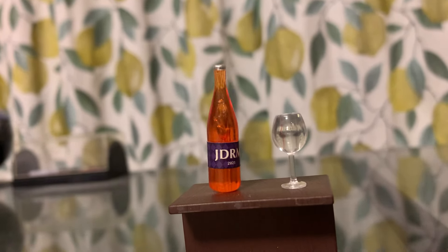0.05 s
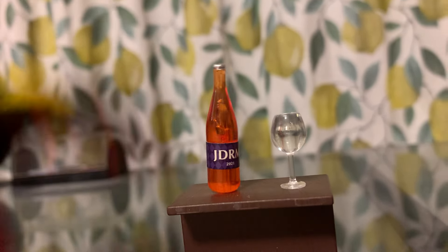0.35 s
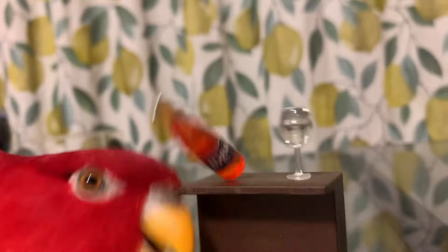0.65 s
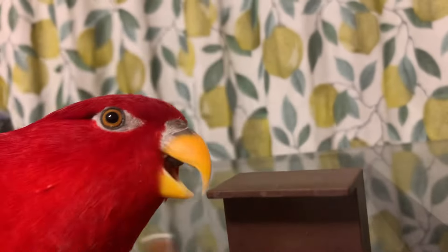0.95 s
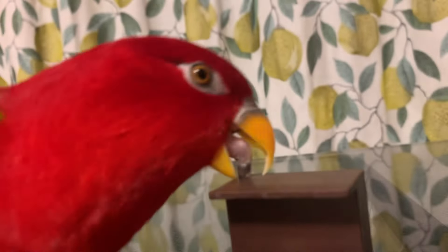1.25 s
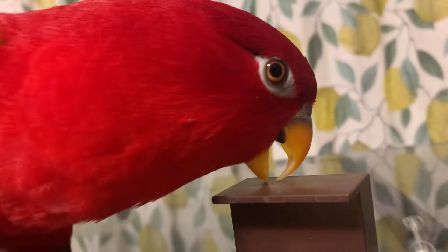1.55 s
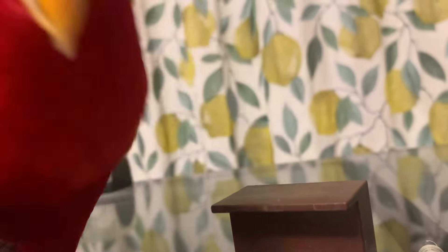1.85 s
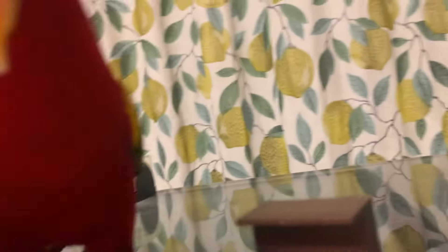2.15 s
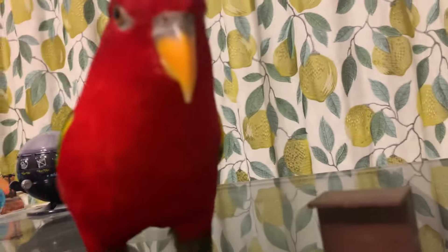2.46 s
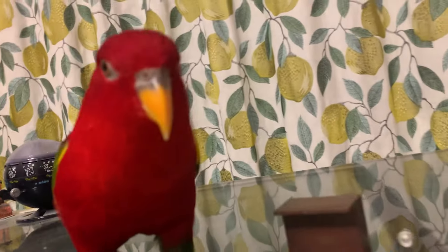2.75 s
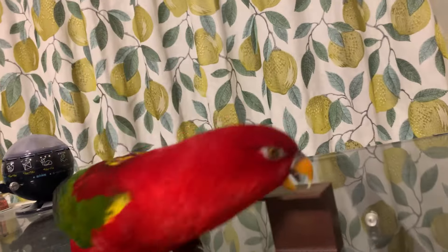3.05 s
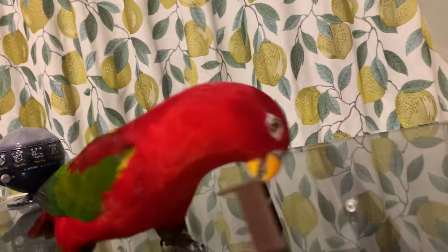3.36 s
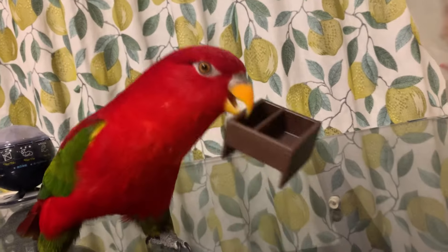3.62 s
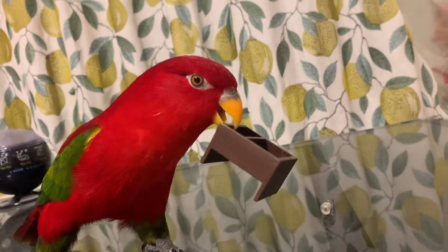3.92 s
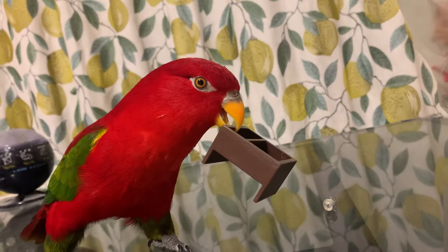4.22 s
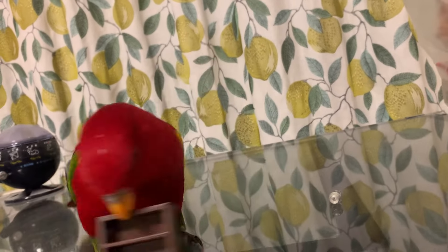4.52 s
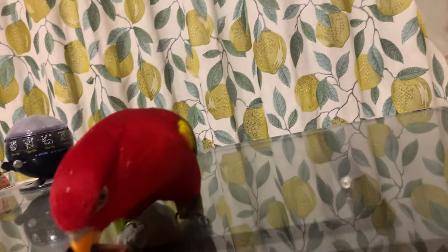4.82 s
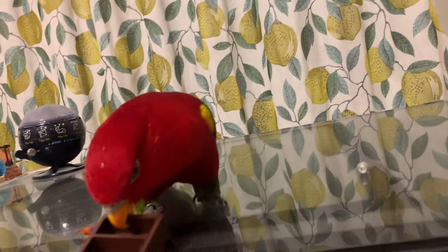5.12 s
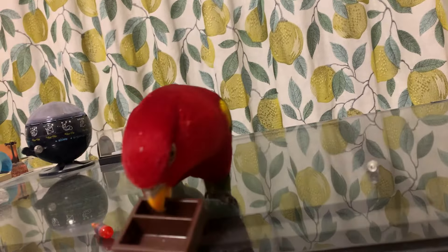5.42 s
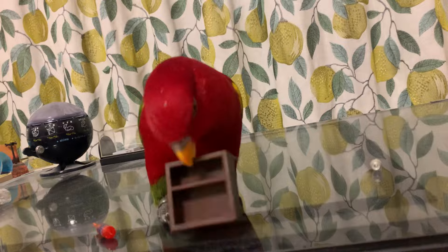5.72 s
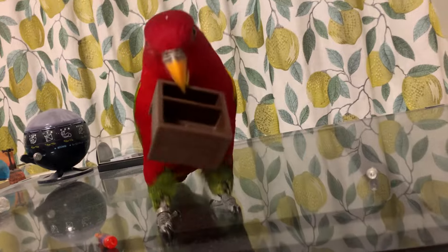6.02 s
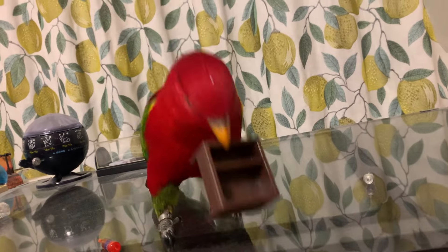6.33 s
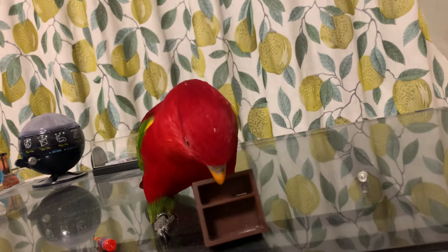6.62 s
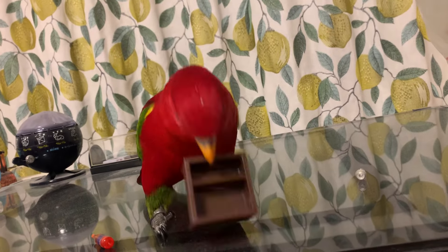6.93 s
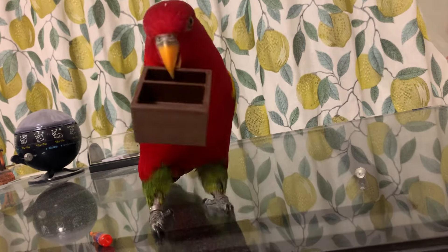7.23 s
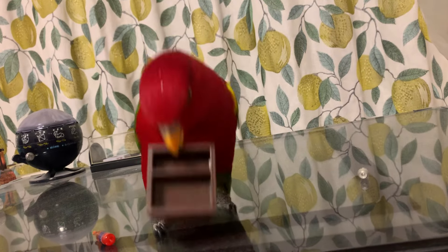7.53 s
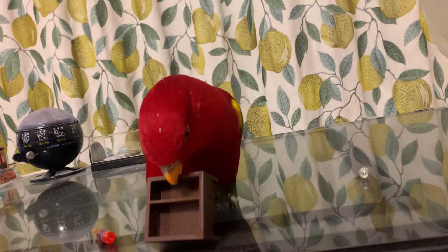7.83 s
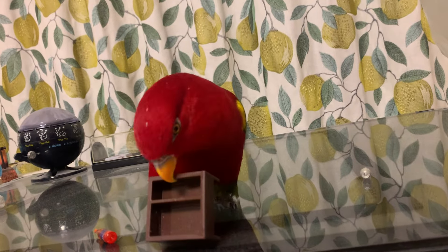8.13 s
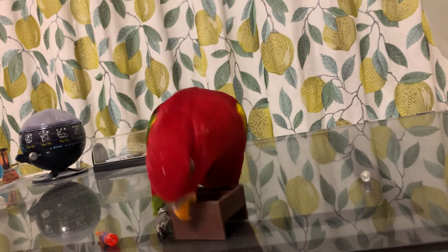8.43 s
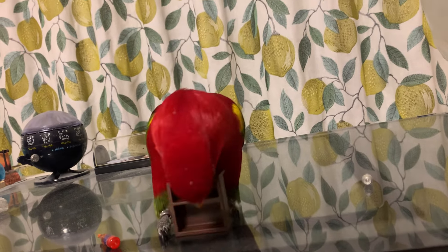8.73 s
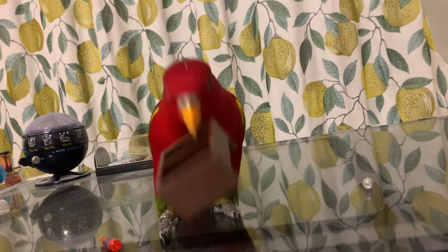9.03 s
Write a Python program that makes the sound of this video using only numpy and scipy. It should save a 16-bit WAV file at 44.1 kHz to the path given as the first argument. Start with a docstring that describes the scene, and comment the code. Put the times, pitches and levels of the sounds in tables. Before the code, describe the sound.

Fingers bump and rub the microphone for the first half second, over a soft hiss and low hum in a small, echoing room. At about 0.7 seconds a tiny bottle topples onto a glass table. A miniature wine glass bounces with rapid, bright clinks, mixed with a short roll, and rattles to rest by 1.7 seconds. A parrot's beak clicks lightly near 2 seconds, then pecks and scratches a toy cabinet from 3 to 4 seconds. The cabinet bangs down at 4.5 seconds and tumbles loudly with a brief scrape, making the table ring and boom. Faint dragging with small squeaks follows around 5.5 seconds. Single sharp knocks land at 6.4 and 7.6 seconds, with a few soft pecks afterwards. At 8.3 seconds the cabinet drops with a loud clack and a squealing skid, then clatters and rocks until about 8.8 seconds.

```python
"""First you hear fingers bump and rub a phone, over a soft mains hum in a small, echoing room.
A parrot on a glass table raids a doll's-house cabinet: a tiny bottle and wine glass fall, clink,
bounce and roll away. It pecks the cabinet, bangs it down, drags it and lets it tumble.
Each knock is a click and a burst of noise that makes the object ring and the table boom.
Each scrape is a stream of tiny catches as an edge sticks and slips."""
import sys
import numpy as np
from scipy import signal
from scipy.fft import rfft, irfft
from scipy.io import wavfile

SR = 44100
rng = np.random.default_rng(int(sys.argv[2]) if len(sys.argv) > 2 else 0)


def int16_out(signal):
    """Quantize to a 16-bit WAV file."""
    q = np.round(np.clip(np.atleast_2d(signal).T, -1, 1) * 32767)
    wavfile.write(sys.argv[1], SR, q.astype(np.int16))


N = 408807
T = np.arange(N) / SR

# The room's soft hiss. Each row: pitch in Hz, level in dB.
AIR_COLOUR = [(25, -34), (45, -9.5), (80, -5.5), (105, 1.5), (130, -13.5), (280, -11), (450, -22.5),
              (700, -26.5), (1300, -26), (2200, -34), (3500, -42), (7000, -46.5), (10000, -45),
              (16000, -51)]
# Bumps on the phone. Each row: time in seconds, pitch in Hz, level in dB, half length in seconds.
BUMPS = [(.01, 289, -28, 0.0086), (0.042, 293, -19, 0.0047), (0.054, 96, -15.5, 0.012),
         (0.08, 350, -31, 0.0026), (0.109, 90, -28, .008), (0.118, 327, -26, 0.0049),
         (0.15, 100, -31, 0.0047), (.154, 242, -32.5, 0.0045), (0.169, 78, -31.5, 0.016),
         (0.187, 325, -36.5, 0.0052), (0.281, 65, -35, 0.024), (0.288, 318, -34.5, 0.01),
         (0.296, 310, -34.5, 0.0086), (0.3577, 810, -27.5, 0.0013), (0.3583, 394, -25, 0.0013),
         (0.363, 170, -35, 0.0044), (0.416, 98, -23.5, 0.0045), (0.463, 159, -29.5, 0.012),
         (0.495, 126, -38, 0.0083)]
# Fingers rub the phone. Each row: start and length in seconds, level in dB.
RUB = [(0.0059, 0.51, -31)]
# The rub's tone. Each row: pitch in Hz, level in dB.
RUB_COLOUR = [(35, 16.5), (130, 7.5), (450, 0), (700, -2), (1200, -7), (1800, -13.5), (3500, -12.5),
              (7000, -20), (10000, -21), (16000, -28)]

# The borders in Hz of a knock's four ranges: thud, clack, snap and tick.
RANGE_EDGES_HZ = [150, 1400, 4000, 7500, 16000]
# Dull taps: fingers knocking the phone at first, then light taps on the table.
# Each row: start in seconds, level in dB, sharpness from 0 (flat) to 1 (sharp).
TAPS = [(.2803, -40.5, 1), (.3547, -38.5, 0.8), (.3859, -44.5, 0.16), (3.1303, -48, 0.37),
        (4.003, -69.5, 0.07), (4.06, -66.5, 0.6), (4.074, -66, 0.4), (5.286, -55, 0.27), (8.8, -45.5, 0.5)]
# How a tap lands. All TOUCH tables have a flat row, then a sharp row. Each row: fade time in seconds,
# then thud, clack, snap, tick and ring in dB added to the knock's level, then left minus right in dB.
TAP_TOUCH = [(0.0056, 0.021, 3.5, -20.5, -19.5, -29, 0), (0.0067, 0.0015, -16, -18, -12.5, -45.5, -1.2)]
# The beak pecks and nibbles. Each row: start in seconds, level in dB, sharpness.
PECKS = [(1.9392, -47.5, 0.78), (1.951, -45.5, 0.85), (2.9334, -57.5, 0.78), (3.015, -43.5, 0.48),
         (3.198, -49, 0.6), (3.206, -61, 0.76), (3.3288, -34.5, 0.75), (3.4066, -42, 0.3),
         (3.7099, -58.5, 0), (4.026, -60.5, 0.3), (4.073, -67, .35), (5.658, -66, 0.7), (7.7974, -56, 0),
         (7.8298, -45, 0), (8.089, -64.5, 0.58), (8.184, -80, 0.91)]
# How the beak lands, laid out like TAP_TOUCH.
BEAK_TOUCH = [(0.019, -17.5, -0.54, -17.5, -68.5, -21.5, -1.5), (0.0029, -16.5, -0.26, 5.5, 17, -7, -3.5)]
# Tones of the beak on the cabinet's edge. Each row: pitch and width in Hz, level in dB.
BEAK_BODY = [(466, 80, 2.5), (2640, 470, 17), (3387, 250, 10), (4326, 470, 8), (5640, 1000, 4.5),
             (10470, 120, 9.5)]
# The hollow ring of taps and pecks. Each row: pitch in Hz, level in dB, seconds to fade by 60 dB.
HOLLOW_MODES = [(487, -4.5, .16), (576, -6.5, 0.11), (1212, -3, 0.035), (3420, 3, 0.038), (4270, -10, 0.15)]
# The table top bends and booms. Each row: pitch in Hz, level in dB, seconds to fade by 60 dB.
BOOM_MODES = [(64, -16, 0.54), (98.5, -7, 0.34), (133, -10, 0.33), (170, -6.5, 0.31), (223.9, -5, 0.27),
              (284, -0.5, 0.074), (373, -5, 0.079), (434, 0, 0.24), (495, -5, 0.1), (564, -5, 0.11),
              (681, 1.5, 0.11), (783, -0.5, 0.12), (900, -3.5, 0.15)]

# The bottle slides off, then rolls. Each row: start and length in seconds, level in dB.
ROLL = [(.62, 0.053, -62.5), (.712, 0.027, -32.5), (1.115, 0.13, -27)]
# The roll's tone. Each row: pitch in Hz, level in dB.
ROLL_COLOUR = [(120, -14), (450, -14), (950, 4), (1400, 1), (2500, 2), (3500, -2.5), (4500, -18),
               (7000, -21.5), (10400, -19), (12000, -36), (16000, -43)]
# The bottle topples. Each row: start in seconds, level in dB, sharpness.
TOPPLE = [(.673, -45, 0.14), (.6915, -37, 0.76), (.709, -38.5, 0.093), (.7165, -37.5, 0.22),
          (.7375, -44.5, 0.45), (.8015, -37, 0.73), (.8065, -31, 0.68)]
# How the bottle lands, laid out like TAP_TOUCH.
BOTTLE_TOUCH = [(.0035, 4, -6.5, -7, -10, 1, -1.5), (.0035, -12.5, 6, -8, 4, 10, 0)]
# Tones of the bottle on the table. Each row: pitch and width in Hz, level in dB.
BOTTLE_BODY = [(530, 200, 3.5), (1000, 620, 0.5), (2292, 460, 11), (3492, 110, 22.5), (4200, 330, 11.5),
               (8850, 690, 14), (11200, 390, 7)]
# The bottle rings. Each row: pitch in Hz, level in dB, seconds to fade by 60 dB.
BOTTLE_MODES = [(3450, -8, .022), (3960, -8.5, .02), (5020, -3, 0.02), (5740, -4, 0.018),
                (6150, -11, 0.013), (8600, -2.5, .016), (9400, -8, 0.016)]
# Pings from stiff spots. Each row: start in seconds, pitch in Hz, level in dB,
# seconds to fade by 60 dB, left minus right in dB.
PINGS = [(.8095, 3340, -18, 0.021, -2), (3.016, 4240, -58, 0.28, -2), (3.198, 3470, -30, 0.031, -6),
         (3.205, 5820, -43, .035, -7), (3.3285, 4100, -24, 0.013, -9), (3.3285, 4340, -43, .3, -2),
         (3.329, 10600, -25, 0.021, -2), (3.33, 517, -45.5, 0.15, 0), (4.7795, 5830, -25, 0.023, 0.5),
         (5.6575, 5337, -49.5, .035, -4), (8.2878, 5050, -3.5, 0.031, -7.5),
         (8.3324, 4760, -15.5, 0.023, -5.5), (8.359, 2270, -17, 0.017, -7.5), (8.5462, 4310, -30, .24, 2),
         (8.548, 8540, -20, .02, 2)]
# Bottle and wine glass bounce. Each row: start in seconds, level in dB, sharpness.
BOUNCES = [(0.8101, -28.5, 1), (.812, -30.5, 0.7), (.88, -49, 0.8), (0.8935, -32, 0.87),
           (0.9349, -26.5, 0.53), (.942, -30, 0.68), (1.0131, -30.5, 0.6), (1.0306, -34, .7),
           (1.0387, -28, 0.92), (1.0896, -25, 0.63), (1.1185, -27.5, 0.84), (1.149, -31.5, 0.67),
           (1.199, -29, 0.56), (1.228, -26.5, 0.6), (1.2434, -29.5, 0.63), (1.255, -30, 0.45),
           (1.289, -30, 0.53), (1.325, -31, 0.5), (1.3548, -32.5, 0.5), (1.358, -28, 0.4),
           (1.3818, -38, 0.65), (1.44, -35.5, 0.56), (1.4652, -43, 0.73), (1.503, -39, 0.1),
           (1.6028, -44, 0.15), (1.6753, -56, 0.06)]
# How the wine glass lands, laid out like TAP_TOUCH.
GLASS_TOUCH = [(0.0039, -13.5, 0, -0.86, -16.5, -24, -1.8), (0.0071, -12.5, -5, 0.15, 3.5, 11, -1.8)]
# Tones of its bowl and foot. Each row: pitch and width in Hz, level in dB.
GLASS_BODY = [(543, 180, 1), (984, 330, 1.5), (2330, 480, 10), (3297, 500, 11.5), (4980, 499, 3.5),
              (8870, 1200, 7.5), (10340, 400, 3.5)]
# The wine glass rings. Each row: pitch in Hz, level in dB, seconds to fade by 60 dB.
GLASS_MODES = [(10430, 0.5, 0.033), (10340, -8, 0.0095)]
# The rolling glass rattles. Each row: start and length in seconds, level in dB.
RATTLE = [(1.525, 0.038, -50.5), (1.635, 0.066, -53.5)]
# The rattle's tone. Each row: pitch in Hz, level in dB.
RATTLE_COLOUR = [(300, -6), (1200, -9), (2500, -1), (3500, 0.5), (5000, -1), (7000, -6), (10500, -24),
                 (12000, -22), (16000, -35)]

# The beak or a cabinet corner scratches. Each row: start and length in seconds, level in dB.
SCRATCHES = [(3.23, 0.029, -62.5), (3.308, 0.055, -54), (3.41, 0.069, -50.5), (4.8, .095, -42),
             (8.55, 0.06, -39.5)]
# A scratch's tone. Each row: pitch in Hz, level in dB.
SCRATCH_COLOUR = [(400, -2), (1500, -3), (2600, 0.5), (3500, 5.5), (4400, 4), (5500, -2.5), (7500, -3),
                  (9600, -10.5), (10500, -1.5), (11300, -21.5), (16000, -30.5)]
# A skidding edge squeals. Each row: start and length in seconds, pitch in Hz, level in dB.
SQUEALS = [(3.399, 0.022, 10460, -52), (4.837, 0.0099, 10450, -35), (4.866, .02, 10620, -46),
           (8.303, 0.093, 3188, -34), (8.335, 0.052, 7680, -39.5)]
# The cabinet is banged down. Each row: start in seconds, corner level in dB,
# seconds until the base lands, base level in dB, extra snap in dB.
BANGS = [(4.477, -30, .004, -32, 3.5), (6.397, -35, .0106, -28, -3.5), (7.5513, -35.5, 0.0095, -25.5, 1.5)]
# How a bang lands, laid out like TAP_TOUCH.
BANG_TOUCH = [(.004, -2.5, -12, 0.015, 0.81, -4.5, -2.5), (0.0065, -3, -15, 0.94, 1.4, -6, -1.5)]
# The cabinet's hollow tones. Each row: pitch and width in Hz, level in dB.
CABINET_BODY = [(243, 36, -1.5), (440, 24, 11.5), (490, 39, 13.5), (564, 24, 11.5), (680, 40, 6.5),
                (794, 29, 6), (870, 35, 4.5), (985, 45, 8), (1136, 64, 13.5), (1290, 97, 1), (1550, 23, -4),
                (1870, 8.3, 5.5), (2220, 370, 8.5), (2590, 430, 2), (3120, 170, 1), (5235, 140, 5.5),
                (5800, 430, 12), (6930, 250, 3.5), (7460, 96, 5.5), (8543, 380, 11.5), (9550, 730, 10)]
# The glass table rings. Each row: pitch in Hz, level in dB, seconds to fade by 60 dB.
TABLE_MODES = [(4285, 7, 0.06), (4370, -14, .2), (4130, -3, .05), (4200, -14, 0.18), (4440, -24, .25),
               (5200, 0, 0.026), (5340, -12, .025), (8100, -14, 0.015)]
# The loose cabinet drops, tips and rocks. Each row: start in seconds, level in dB, sharpness.
TUMBLES = [(4.5428, -48, .95), (4.7177, -36, .7), (4.734, -32, 0.7), (4.7378, -18.5, 0.03),
           (4.7475, -16.5, .24), (4.7795, -26, 0.3), (4.8426, -43, .4), (8.288, -17, 0.05),
           (8.2902, -27, 0.2), (8.3324, -22.5, 0.29), (8.359, -28.5, 0.3), (8.3772, -40.5, .55),
           (8.417, -37.5, 0.6), (8.4955, -38, 0.7), (8.502, -38.5, .94), (8.523, -46, 0.9),
           (8.5336, -38.5, 1), (8.5462, -24, 0.04), (8.5495, -22, 0.2), (8.569, -40.5, .93),
           (8.589, -43, 0.93), (8.5986, -42, 0.8), (8.6076, -29, 0), (8.618, -32.5, 0.26),
           (8.6479, -36.5, 0), (8.724, -45.5, 0.16), (8.7849, -40.5, 0), (8.8, -53.5, 0.83),
           (8.811, -47.5, 0)]
# How the loose cabinet lands, laid out like TAP_TOUCH.
TUMBLE_TOUCH = [(0.0071, -16.5, 0, -8, -21.5, -5, -1.5), (0.0018, -8.5, -11, -1, 3, -11, -3)]
# Its panels and the table ring. Each row: pitch in Hz, level in dB, seconds to fade by 60 dB.
PANEL_MODES = [(1150, -6.5, .08), (1557, -0.5, .08), (1730, -7, 0.081), (2210, -8.5, .04), (2723, 0.5, .05),
               (3326, -3, .06), (4190, -7, 0.11), (4280, -5, .08), (4930, -6, .05), (5680, -7.5, .06)]

# The cabinet is dragged. Each row: start and length in seconds, level in dB.
DRAGS = [(5.35, 0.075, -57.5), (5.53, 0.075, -57)]
# The drag's tone. Each row: pitch in Hz, level in dB.
DRAG_COLOUR = [(150, -4), (500, 13), (1200, 1.5), (2200, 4), (3300, -1), (4050, 0), (4300, 6), (4600, 1),
               (5500, -8), (6300, -7), (7800, 1), (8500, 0.5), (9200, -14), (10300, -14), (11500, -22),
               (16000, -41)]
# The dragged edge jolts. Each row: start in seconds, level in dB, sharpness.
JOLTS = [(5.3112, -66, 0.15), (5.3626, -55.5, 1), (5.3905, -61, .5), (5.4943, -58.5, 0.7),
         (5.5287, -53, 0.3), (5.5422, -57, 0.3), (5.5591, -51, 0.6), (5.589, -53.5, .7),
         (5.602, -52.5, 0.9)]
# How a jolt lands, laid out like TAP_TOUCH.
JOLT_TOUCH = [(0.0076, -1, -16, -7, -18, -5, -1), (0.0035, -6, -15, -4.5, -13, -3.5, -1)]
# The table squeaks. Each row: start and length in seconds, level in dB.
SQUEAK = [(5.4, 0.035, -57), (5.535, 0.02, -46), (5.56, 0.015, -46.5), (5.582, 0.013, -54)]
# The squeak's tone. Each row: pitch in Hz, level in dB.
SQUEAK_COLOUR = [(2000, -54), (3900, -17), (4200, 0), (4330, 4), (4480, -16), (4800, -28), (9000, -55)]
# The cabinet shifts in the beak. Each row: start and length in seconds, level in dB.
SHIFT = [(7.1, 0.043, -62), (7.44, 0.029, -63.5)]
# The shift's tone. Each row: pitch in Hz, level in dB.
SHIFT_COLOUR = [(400, -17.5), (900, 2), (1150, 5.5), (1600, -10.5), (3000, -14), (5500, -24), (8000, -41),
                (16000, -45)]
# The tipped cabinet skids on one edge. Each row: start and length in seconds, level in dB.
SKID = [(7.832, 0.07, -58), (8.283, 0.06, -30)]
# The skid's tone. Each row: pitch in Hz, level in dB.
SKID_COLOUR = [(300, -11.5), (1200, -14.5), (2200, 1.5), (2650, 4), (3300, 5.5), (3700, -4), (4800, 5.5),
               (5100, 3), (5500, -2.5), (6300, -1.5), (7300, -10), (9300, -22.5), (11000, -38.5),
               (16000, -43)]

# The room's echo. Each row: pitch in Hz, level in dB, seconds to fade by 60 dB.
ROOM = [(150, 4, 1), (407, -2.5, 0.29), (900, -6.5, 0.53), (1850, -10, 0.57), (4130, -6.5, 0.54),
        (6500, -12.5, 0.45), (9600, -16, 0.26), (14000, -17.5, 0.38)]
# The microphone's tone. Each row: pitch in Hz, boost in dB.
MICROPHONE = [(20, 3.5), (10800, -0.5), (11800, 2.5), (14000, -2), (16000, -8)]


def undb(db):
    """Turn decibels into a multiplier."""
    return 10 ** (np.asarray(db) / 20)


def unit(x):
    """Scale a sound to an average power of 1."""
    return x / np.sqrt(np.mean(x ** 2))


def blow_level(x, db):
    """Set a knock's level by its first moments."""
    power = np.sum(x[..., :int(.012 * SR)] ** 2, axis=-1).mean() / (.01 * SR)
    return x * undb(db) / np.sqrt(power)


def add(out, s, x):
    """Mix x into out from s seconds on."""
    i = max(int(s * SR), 0)
    out[:, i:i + x.shape[-1]] += x[..., :N - i]


def sides(pan_db):
    """Left and right multipliers, pan_db apart."""
    return unit(undb(np.array([[pan_db], [-pan_db]]) / 2))


def band(x, lo_hz, hi_hz, order=3):
    """Keep the sound between two pitches."""
    sos = signal.butter(order, [lo_hz, min(hi_hz, SR / 2 - 1)], "band", fs=SR, output="sos")
    return signal.sosfilt(sos, x)


def colour(x, points):
    """Shape a sound's tone along (Hz, dB) points."""
    hz, db = np.transpose(points)
    f = np.fft.rfftfreq(x.shape[-1], 1 / SR) + 1
    gain = undb(np.interp(np.log(f), np.log(hz), db)) * np.minimum(f / hz[0], 1)
    return irfft(rfft(x) * gain, x.shape[-1])


def stereo(pair, alike_hz):
    """Turn two unrelated noises into a left and right that agree in the bass."""
    f = np.fft.rfftfreq(pair.shape[-1], 1 / SR)
    alike = .95 / (1 + (f / alike_hz) ** 2)
    mid, side = rfft(pair) * np.sqrt([1 + alike, 1 - alike])
    return irfft(np.array([mid + side, mid - side]), pair.shape[-1]) / np.sqrt(2)


def ringing(modes, t, detune, spread_db):
    """A struck thing rings with fading tones (modes); each spot gives another mix."""
    tone = 0
    for hz, db, fade_s in modes:
        shift, size, start, offset = rng.standard_normal(4)
        apart = offset * min(hz / 1500, 1)
        phase = 2 * np.pi * hz * (1 + detune * shift) * t + np.pi * start + np.array([[apart], [-apart]])
        tone = tone + undb(db + spread_db * size - 60 * t / fade_s) * np.sin(phase)
    return tone


def contacts(rows, touch):
    """How sharply a knock lands sets its length, tone, ring and side."""
    flat, sharp = np.array(touch)
    hits = []
    for s, db, sharpness in rows:
        decay, *levels, pan_db = flat + np.clip(sharpness, 0, 1) * (sharp - flat)
        hits.append((s, decay, *(db + np.array(levels)), pan_db))
    return hits


def strikes(hits, body, modes, spot_db, body_db, ring_db, detune, rise_s, first_db, grain,
            linger_db, linger_s, click_db):
    """Hard edges click and chatter; this sounds through the object's body and sets it ringing."""
    out, t = np.zeros((2, N)), T[:SR // 3]
    attack = 1 - np.exp(-t / rise_s)
    for s, decay, *levels, ring, pan_db in hits:
        first_touch = undb(first_db) * np.exp(-t / .00067)
        linger = undb(linger_db) * np.exp(-t / linger_s)
        envelope = attack * (first_touch + np.exp(-t / max(decay, 1e-4)) + linger)
        noise = stereo(rng.standard_normal((2, len(t))), 2000)
        chatter = noise * np.exp(grain * rng.standard_normal(len(t))) * envelope
        chatter[:, int(rise_s * SR)] += undb(click_db)
        hollow = chatter
        for hz, width, db in body:
            gain = undb(db + body_db + spot_db * rng.standard_normal())  # varies with the spot struck
            hollow = hollow + gain * signal.lfilter(*signal.iirpeak(hz, hz / width, SR), chatter)
        ranges = zip(RANGE_EDGES_HZ, RANGE_EDGES_HZ[1:], levels)
        knock = sum(blow_level(band(hollow, lo, hi, order=4), db) for lo, hi, db in ranges)
        tone = blow_level(attack * ringing(modes, t, detune, spread_db=1.5), ring + ring_db)
        add(out, s - rise_s, (knock + tone) * sides(pan_db))
    return out


def strokes(rows, rise, fall, sag_db, depth_db=22):
    """Each stroke swells, sags and dies away; rise and fall are multiples of its length."""
    return [[(s - rise * length, db - depth_db), (s, db), (s + length, db - sag_db),
             (s + (1 + fall) * length, db - sag_db - depth_db)] for s, length, db in rows]


def friction(curves, points, per_second, spread_db, slip_db, slip_hz):
    """A sliding edge makes many tiny catches, which swell and stall as it sticks and slips."""
    catches = (rng.random(N) < per_second / SR) * undb(spread_db * rng.standard_normal(N))
    grains = stereo(catches * rng.standard_normal((2, N)), 1100)
    grip = rng.uniform(-1, 1, 4096)
    slip = undb(slip_db * np.interp(T * slip_hz, np.arange(len(grip)), grip))
    force = sum(undb(np.interp(T, *np.transpose(curve), left=-np.inf, right=-np.inf)) for curve in curves)
    return unit(colour(grains * slip, points)) * force


def background(air_db=-59, hum_hz=103.2, hum_db=-63.5):
    """The room's air hisses softly and an appliance gives a wavering hum."""
    air = unit(colour(stereo(rng.standard_normal((2, N)), 740), AIR_COLOUR))
    waver = unit(band(rng.standard_normal(N), .5, 6, order=1))
    hum = np.sqrt(2) * np.sin(2 * np.pi * hum_hz * T + .14 * waver)
    return undb(air_db) * air + undb(hum_db) * hum


def handling():
    """Fingers bump the phone's case, giving it a few dull swings, and rub over it."""
    bumps = np.zeros((2, N))
    for s, hz, db, width in BUMPS:
        t = T[:SR] - s
        phase = 2 * np.pi * hz * t + np.pi * rng.standard_normal() + .5 * rng.standard_normal((2, 1))
        add(bumps, 0, undb(db) * np.exp(-(t / width) ** 2) * np.sin(phase))
    return bumps + friction(strokes(RUB, rise=.11, fall=1, sag_db=26), RUB_COLOUR,
                            per_second=14000, spread_db=2, slip_db=3.5, slip_hz=54.86)


def taps_and_pecks(hits):
    """Taps and pecks ring briefly and hollowly."""
    return strikes(hits, BEAK_BODY, HOLLOW_MODES, spot_db=6, body_db=-6.5, ring_db=-1, detune=.0036,
                   rise_s=.00067, first_db=11.5, grain=.066, linger_db=-33, linger_s=.021, click_db=15.5)


def table_boom(hits, boom_db):
    """Each thud bends the glass top, which booms; a light, clacking bounce bends it less."""
    out, t = np.zeros((2, N)), T[:SR // 2]
    attack = 1 - np.exp(-t / .00043)
    for s, _, thud_db, clack_db, *_ in hits:
        push_db = thud_db - .41 * max(clack_db - thud_db, 0)
        add(out, s, undb(push_db + boom_db) * attack * ringing(BOOM_MODES, t, detune=.039, spread_db=1.5))
    return out


def rolling():
    """The bottle slides and rolls; the rolling wine glass rattles to rest."""
    roll = friction(strokes(ROLL, rise=.82, fall=.69, sag_db=6), ROLL_COLOUR,
                    per_second=7600, spread_db=0, slip_db=2.5, slip_hz=61.7)
    rattle = friction(strokes(RATTLE, rise=.3, fall=1.2, sag_db=3), RATTLE_COLOUR,
                      per_second=650, spread_db=1, slip_db=1, slip_hz=50)
    return roll + rattle


def bottle_clinks(hits):
    """The toppling bottle strikes the table and rings briefly."""
    return strikes(hits, BOTTLE_BODY, BOTTLE_MODES, spot_db=1.5, body_db=0, ring_db=2.5, detune=.025,
                   rise_s=.0008, first_db=-9, grain=.3, linger_db=-27, linger_s=.01, click_db=10)


def pings():
    """A knock on a stiff spot picks out one fading tone."""
    out, t = np.zeros((2, N)), T[:SR // 3]
    for s, hz, db, fade_s, pan_db in PINGS:
        tone = (1 - np.exp(-t / .0003)) * ringing([(hz, db, fade_s)], t, detune=.003, spread_db=-2)
        add(out, s, tone * sides(pan_db))
    return out


def glass_contacts(on_side_s=1.28, foot_lag_s=.0142, foot_db=-3, foot_sharpness=.33):
    """Once the bouncing wine glass lies on its side, its foot lands just after its bowl."""
    feet = [(s + foot_lag_s, db + foot_db, foot_sharpness) for s, db, _ in BOUNCES if s > on_side_s]
    return contacts(BOUNCES + feet, GLASS_TOUCH)


def glass_clinks(hits):
    """The tiny wine glass lands with a hard click and a very high ring."""
    return strikes(hits, GLASS_BODY, GLASS_MODES, spot_db=5.5, body_db=.5, ring_db=-.5, detune=.02,
                   rise_s=.0002, first_db=6, grain=.41, linger_db=-29, linger_s=.017, click_db=23)


def cabinet_scrapes():
    """The cabinet rubs against the table and the beak."""
    drag = friction(strokes(DRAGS, rise=2.4, fall=.87, sag_db=3), DRAG_COLOUR,
                    per_second=12000, spread_db=3.5, slip_db=3, slip_hz=54.5)
    skid = friction(strokes(SKID, rise=.25, fall=2, sag_db=2), SKID_COLOUR,
                    per_second=4400, spread_db=1, slip_db=6, slip_hz=110)
    shift = friction(strokes(SHIFT, rise=.46, fall=1.1, sag_db=7.5), SHIFT_COLOUR,
                     per_second=1900, spread_db=3, slip_db=1, slip_hz=65.4)
    scratch = friction(strokes(SCRATCHES, rise=.42, fall=1.17, sag_db=.5), SCRATCH_COLOUR,
                       per_second=5000, spread_db=2.5, slip_db=6, slip_hz=86.6)
    return drag + skid + shift + scratch


def squeals(pitch_wander=.0088, flutter_db=4):
    """An edge sticks and slips fast enough to squeal, wavering with its grip."""
    out, t = np.zeros((2, N)), T[:SR // 3]
    for s, length, hz, db in SQUEALS:
        wander, flutter = unit(band(rng.standard_normal((2, len(t))), 15, 160, order=1))
        envelope = (1 - np.exp(-t / .003)) * np.exp(-np.maximum(t - length, 0) / .014)
        phase = 2 * np.pi * np.cumsum(hz * (1 + pitch_wander * wander)) / SR
        add(out, s, undb(db + flutter_db * flutter) * envelope * np.sin(phase))
    return out


def bang_contacts(rebound_s=.0052, rebound_db=-6.5):
    """The cabinet lands on a sharp corner, then flat, and bounces once."""
    hits = []
    for s, corner_db, lag, base_db, snap_db in BANGS:
        rows = [(s, corner_db, 1), (s + lag, base_db, 0), (s + lag + rebound_s, base_db + rebound_db, 0)]
        for at, decay, thud, clack, snap, tick, ring, pan_db in contacts(rows, BANG_TOUCH):
            hits.append((at, decay, thud, clack + snap_db, snap + snap_db, tick, ring + snap_db, pan_db))
    return hits


def cabinet_bangs(hits):
    """The held cabinet hits the table and makes it ring."""
    return strikes(hits, CABINET_BODY, TABLE_MODES, spot_db=4.5, body_db=-6, ring_db=1.5, detune=.003,
                   rise_s=.0006, first_db=-6.5, grain=.22, linger_db=-30, linger_s=.02, click_db=7)


def cabinet_tumbles(hits):
    """The loose cabinet drops and rocks, and its panels ring."""
    return strikes(hits, CABINET_BODY, PANEL_MODES, spot_db=3.5, body_db=-.5, ring_db=2, detune=.004,
                   rise_s=.00062, first_db=-3, grain=.34, linger_db=-31, linger_s=.018, click_db=16)


def cabinet_jolts(hits):
    """The dragged edge catches and lets go with a small knock."""
    return strikes(hits, CABINET_BODY, TABLE_MODES, spot_db=6, body_db=-7, ring_db=3, detune=.0055,
                   rise_s=.0008, first_db=-6, grain=.4, linger_db=-22, linger_s=.015, click_db=15)


def table_squeak():
    """The dragged edge rubs one narrow, high tone out of the table."""
    return friction(strokes(SQUEAK, rise=.46, fall=1.5, sag_db=3), SQUEAK_COLOUR,
                    per_second=3400, spread_db=6, slip_db=1, slip_hz=60.2)


def room_echo(x):
    """Walls and furniture return a dense echo that lasts longest in the bass."""
    t = T[:SR]
    hz, db, fade_s = np.transpose(ROOM)
    noise, tail = stereo(rng.standard_normal((2, SR)), 500), 0
    edges = np.geomspace(60, 17000, 17)
    for lo, hi in zip(edges, edges[1:]):
        centre = np.log(lo * hi) / 2
        decay_s = np.interp(centre, np.log(hz), fade_s) / np.log(1000)
        gain = undb(np.interp(centre, np.log(hz), db)) * np.sqrt(2 / (decay_s * SR))
        tail = tail + band(noise, lo, hi) * np.exp(-t / decay_s) * gain
    tail = tail * np.clip((t - .003) / .0011, 0, 1)  # the echo starts 3 ms late
    return signal.fftconvolve(x, tail, axes=-1)[:, :N]


def left_first(pair, lag_s):
    """Sound reaches the left microphone just before the right."""
    f = np.fft.rfftfreq(N, 1 / SR)
    return np.array([pair[0], irfft(rfft(pair[1]) * np.exp(-2j * np.pi * f * lag_s), N)])


def scene():
    """Mix toys, cabinet and beak, each with its share of the echo."""
    bottle_hits, glass_hits = contacts(TOPPLE, BOTTLE_TOUCH), glass_contacts()
    bang_hits, tumble_hits = bang_contacts(), contacts(TUMBLES, TUMBLE_TOUCH)
    light_hits = contacts(PECKS, BEAK_TOUCH) + contacts(TAPS, TAP_TOUCH)
    bottle, glass = bottle_clinks(bottle_hits), glass_clinks(glass_hits)
    bangs, tumbles = cabinet_bangs(bang_hits), cabinet_tumbles(tumble_hits)
    pecks = taps_and_pecks(light_hits)
    jolts = cabinet_jolts(contacts(JOLTS, JOLT_TOUCH))
    ping, squeal = pings(), squeals()
    boom = (table_boom(bang_hits, boom_db=-3.5) + table_boom(tumble_hits, boom_db=-2)
            + table_boom(bottle_hits + glass_hits, boom_db=-15) + table_boom(light_hits, boom_db=-10))
    roll, scrapes, squeak = rolling(), cabinet_scrapes(), table_squeak()
    echo = room_echo(undb(-4.5) * bottle + undb(-.5) * glass + undb(1.5) * bangs
                     + undb(.5) * (tumbles + pecks) + undb(3) * (roll + scrapes) + undb(-20) * squeak
                     + undb(-6.5) * ping + undb(2.5) * squeal + undb(-2) * jolts)
    knocks = bottle + glass + bangs + tumbles + pecks + jolts + ping + boom
    direct = left_first(knocks + roll + scrapes + squeak + handling(), lag_s=.00019)
    return direct + squeal + echo + background()


def record(dry, treble_hz=7300, treble_lag_s=.000215, top_hz=15900):
    """The phone's two sides share one treble, a shade later on the left; the very top is cut."""
    f = np.fft.rfftfreq(N, 1 / SR)
    left, right = rfft(colour(dry, MICROPHONE))
    blend = np.pi / 2 * np.clip((f - treble_hz) / 1000 + .5, 0, 1)
    left = np.cos(blend) * left + np.sin(blend) * right * np.exp(-2j * np.pi * f * treble_lag_s)
    top_cut = signal.ellip(8, .2, 70, top_hz, fs=SR, output="sos")
    return signal.sosfilt(top_cut, irfft(np.array([left, right]), N))


dry = scene()
out = record(dry)
int16_out(out)
```